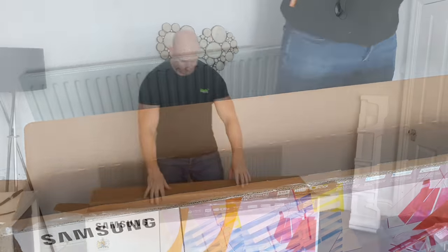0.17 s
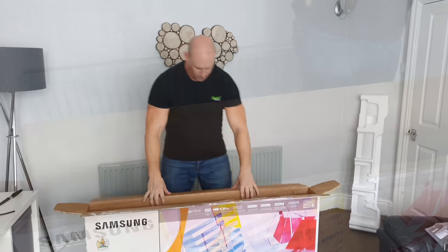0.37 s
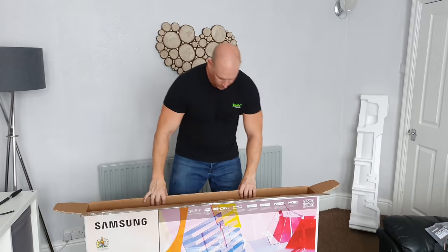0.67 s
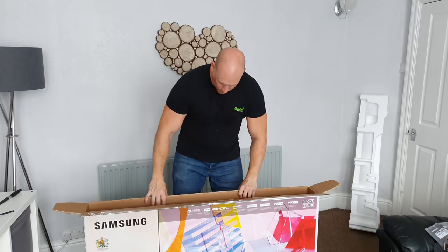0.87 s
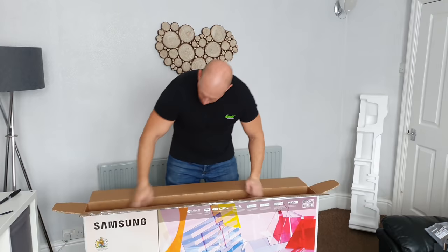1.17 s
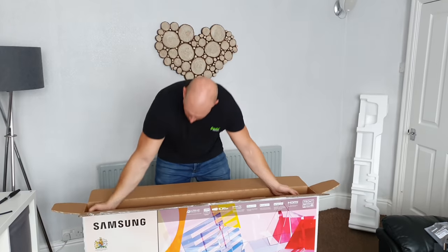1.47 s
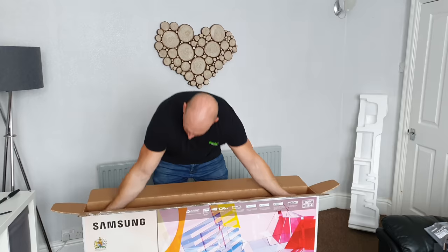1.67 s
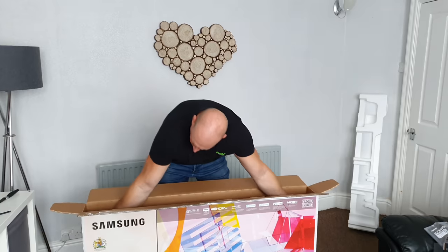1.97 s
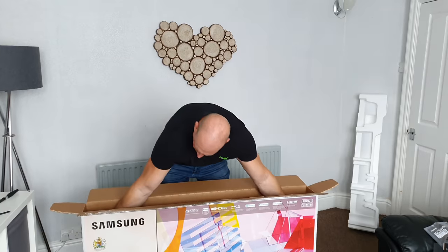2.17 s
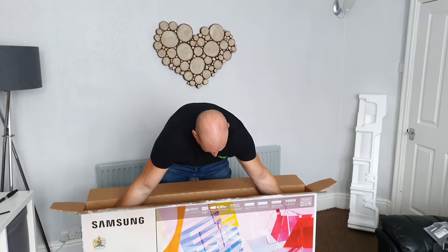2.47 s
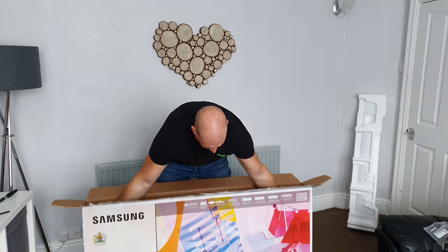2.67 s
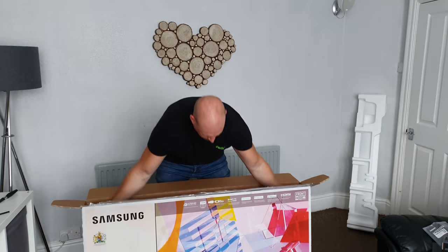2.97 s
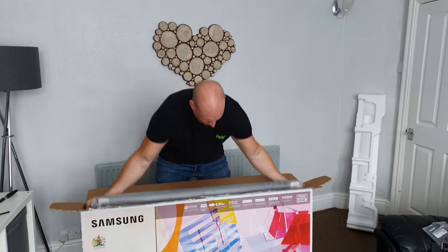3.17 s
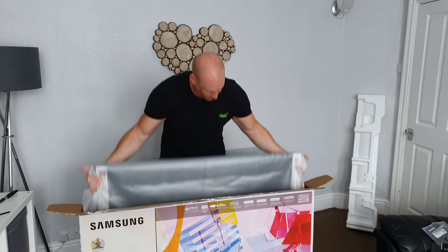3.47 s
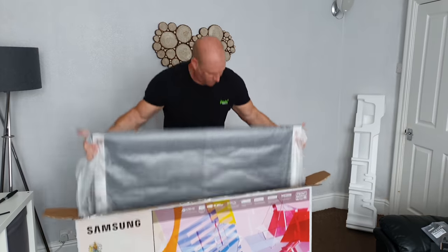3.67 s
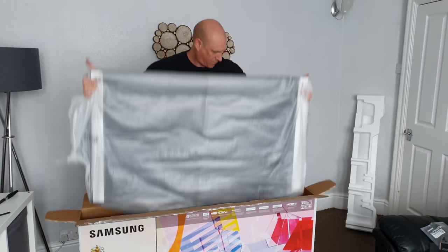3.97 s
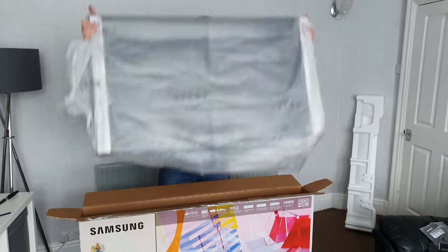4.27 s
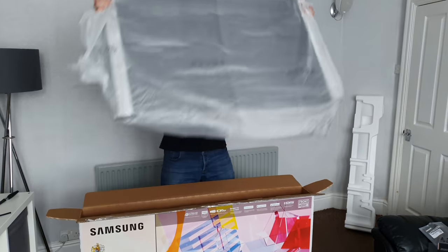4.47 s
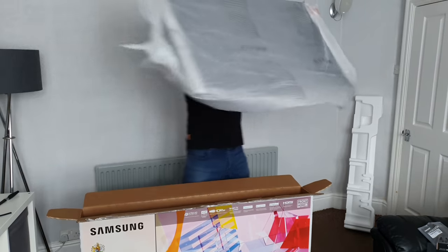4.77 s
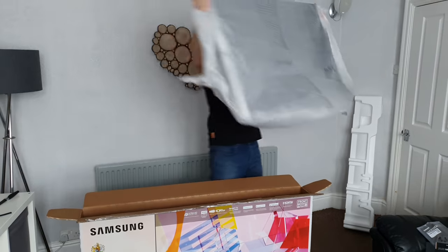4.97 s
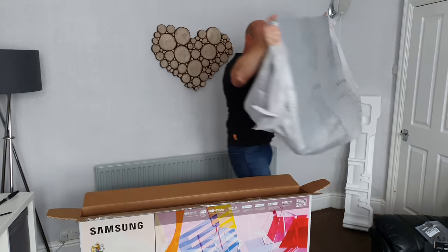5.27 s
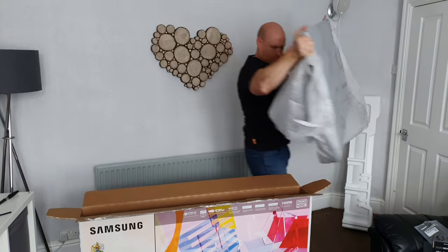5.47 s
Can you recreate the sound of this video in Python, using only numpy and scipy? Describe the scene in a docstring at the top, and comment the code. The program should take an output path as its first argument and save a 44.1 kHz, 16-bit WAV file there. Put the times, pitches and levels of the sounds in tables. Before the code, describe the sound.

In a living room, hands brush and scrape a large cardboard box, with hollow flap slaps near the start. A thin foam sleeve then slides off in one long squeaky hiss, ending in a loud, deep, boomy thud with a crack. Quiet rustling follows and grows as the sleeve is gathered, over a faint hum. Stereo microphone a few metres away.

```python
"""Hands brush and tap a large cardboard box with polystyrene packing, unpacked in a living room.
Flaps slap, a thin foam sleeve hisses off in one long pull, the load drops back with a deep thud, and
the sleeve rustles as it is carried off. Blows ring modes of box and flap; rubbing is a train of tiny
random slips, coloured and shaped by strokes; far away, a hum of wavering partials swells and sags."""
import sys
import numpy as np
from scipy import signal
from scipy.fft import rfft, irfft, next_fast_len
from scipy.io import wavfile

SR = 44100
rng = np.random.default_rng(int(sys.argv[2]) if len(sys.argv) > 2 else 0)


def wrap_up_sound(samples):
    """Save the sound to the file named by the first command line argument, as 16-bit audio."""
    columns = np.atleast_2d(samples).T
    # keep every value between -1 and 1, then stretch to whole-number steps
    tamed = np.clip(columns, -1, 1)
    steps = np.round(tamed * 32767).astype(np.int16)
    wavfile.write(sys.argv[1], SR, steps)


N = 247401
TIME = np.arange(N) / SR   # s

# Levels are relative: filters, boosts and the sum of layers set the final ones.
# blows on the box: start_s, level_db, panel_hz, dull_above_hz, loose_rattle_db, contact_build_s
KNOCKS = [(0.001, -42.5, 86, 736, 8.5, 0.0018), (0.305, -35, 130, 239, 10.5, 0.0082),
          (.555, -45, 120, 350, 2.5, 0.0036), (0.606, -39.5, 96, 604, 10.5, .002),
          (0.8445, -19.5, 160, 627, 7.5, 0.00097), (0.860, -24, 196, 650, -0.5, 0.00085),
          (0.888, -28.5, 135, 534, 11, 0.0012), (.992, -48, 250, 700, 10, .001),
          (1.262, -40, 272, 400, -2, 0.0024), (1.392, -20.5, 120, 448, 4.5, 0.0016),
          (1.406, -30.5, 118, 300, 10.5, 0.0017), (1.433, -23.5, 126, 340, 5.5, 0.00082),
          (1.512, -40, 170, 600, 9, .001), (1.612, -44, 85, 500, 6.5, .0015),
          (1.670, -39, 74.4, 418, 4, 0.0022), (2.61, -36.5, 75, 200, 7, 0.0062),
          (3.548, -34.5, 88, 454, -3, 0.0047), (3.588, -20, 80, 242, -8.5, 0.0045),
          (3.622, -27.5, 280, 350, 7, 0.0026), (3.6355, -12.5, 98, 193.6, -23, 0.0027),
          (3.6915, -3, 132, 150, -8, 0.0017), (3.7035, -1.5, 199, 425, -0.5, 0.0023),
          (3.7495, -10.5, 125, 347, 11, 0.0042), (3.7945, -13.5, 114, 192, 14, 0.0025),
          (3.842, -18, 190, 450, -3, 0.0012), (4.815, -43, 42, 58.3, 7, 0.0014)]
# modes of the box and the air in it: pitch_hz, level_db, t60_s
BOX_MODES = [(36.5, -13.5, 0.53), (72.4, -17, 0.77), (89, -6.5, 0.23), (114.3, -5, 0.43),
             (182.8, -8.5, 0.34), (222, -17.5, 0.43), (279.3, -13.5, 0.38), (362.5, -7.5, 0.26),
             (424, -18.5, 0.38), (546, -10, 0.28), (650, -18, 0.24), (786, -28, 0.22), (875, -22.5, 0.31),
             (987, -16, 0.34)]
# spectrum of the clatter of loose panels: frequency_hz, level_db per Hz
RATTLE_COLOUR = [(25, -14), (50, -20), (90, 4), (200, 10.5), (350, 10.5), (600, 9), (1100, 6), (1800, -5),
                 (4000, -40), (9000, -40), (16000, -36)]
THIN_SHARE = 0.52   # a panel radiates little below this share of its pitch
# loose panels touch a few times after a blow; the room's answer has its own level
CHATTER_PER_S, CHATTER_DECAY_S, RATTLE_TAIL_DB = 160, .035, -1

# the stiff top flap smacked against the box: start_s, level_db, favoured_pitch_hz
SLAPS = [(0.8445, -23, 673), (0.860, -22.5, 586), (0.894, -23.5, 550), (0.933, -32, 605), (.993, -37, 580),
         (1.039, -41.5, 624), (1.394, -35, 700), (1.408, -29.5, 414), (1.436, -28, 350),
         (1.466, -34.5, 550), (1.513, -40, 580), (1.615, -40.5, 397), (1.672, -38.5, 440),
         (3.716, -11, 318)]
# modes of the flap: pitch_hz, level_db, t60_s
FLAP_MODES = [(254, -15.5, 0.2), (360.4, -5.5, 0.079), (417, -8, 0.34), (474, -8.5, 0.22),
              (541.3, -10, 0.18), (578.7, -7, 0.27), (610, -3, 0.14), (683, -7.5, 0.11), (826, -11, 0.11),
              (1030, -22, .2), (1380, -17.5, .15)]

# card and foam crack as the load lands: start_s, level_db
CRACKS = [(3.7035, -22), (3.73, -34), (3.765, -35), (3.815, -43)]
# spectrum of the cracks: frequency_hz, level_db per Hz
CRACK_COLOUR = [(400, -11), (750, 7), (1000, -3), (1150, -2.5), (1400, -1.5), (1850, -5), (2300, -23.5),
                (4000, -25), (9000, -34)]
CRACK_DECAY_S = .012

# hiss of the sleeve sliding off in one pull: time_s, level_db
PULL = [(2.45, -61.5), (2.494, -60.5), (2.582, -57.5), (2.628, -53.5), (2.896, -44.5), (3.364, -43),
        (3.384, -41), (3.56, -44), (3.582, -46), (3.652, -44.5), (3.84, -56), (4.0, -65.5), (4.2, -98)]
# spectrum of the sliding sleeve: frequency_hz, level_db per Hz
SLEEVE_COLOUR = [(450, -31), (800, -5.5), (1150, -3), (1450, 1), (1850, 0.5), (2300, -1.5), (3000, -5.5),
                 (4400, -10.5), (4800, -16), (6500, -17.5), (9000, -22.5), (12400, -21), (14200, -24.5),
                 (15700, -35.5)]
# resonances of the stretched sleeve: pitch_hz (when the pull is strongest), width_hz, level_db
SLEEVE_PEAKS = [(1452, 50, -12), (1810, 46, -13.5), (2070, 110, -15)]
SING_RISE_OCTAVES_PER_S, SING_WANDER_OCTAVES = .1, .018
PULL_TREBLE_DB, TREBLE_GROWTH = -2, 1.39   # treble over middle at the peak; dB of treble per dB of pull
# the sleeve catches on the packing: middle_s, half_length_s, pitch_hz, level_db
CHIRPS = [(3.01, .06, 1400, -46.5), (3.105, .06, 1900, -42.5), (3.2, .06, 1820, -42.5),
          (3.26, .06, 1470, -43), (3.335, .06, 1810, -43), (3.42, .06, 1690, -45), (3.48, .06, 2020, -42.5)]
CHIRP_WAVER_OCTAVES, CHIRP_WAVERS_PER_S = .024, 90

# Every stroke speeds up, holds, then dies away at a steady rate.
# the empty sleeve swinging and folding: start_s, rise_s, hold_s, level_db, treble_over_middle_db
SWINGS = [(3.9, 0.047, 0.14, -61.5, 1), (4.15, 0.031, .02, -62.5, 4), (4.27, 0.018, 0.066, -67.5, -2),
          (4.56, 0.25, 0.1, -64, -2), (4.74, 0.15, 0.17, -60, -5), (5.1, 0.038, 0.13, -60.5, -8.5),
          (5.315, 0.067, 0.047, -47, -0.5), (5.47, 0.029, 0.069, -54.5, -11)]
# spectra of the swinging sheet and of its creases: frequency_hz, level_db per Hz
SWING_COLOUR = [(450, 5), (800, 4), (1050, 8.5), (1400, -1.5), (1900, 7.5), (2600, -6.5), (4200, -4),
                (5000, -12.5), (7000, -15.5), (9000, -19.5), (12500, -13.5), (15700, -25)]
CRINKLE_COLOUR = [(900, -10), (2000, -3), (3800, -9), (5000, -11), (9000, -27)]
SWING_FADE_DB_PER_S = 105
CRINKLES_PER_S, CRINKLE_DB, CRINKLE_CLUMP_DB = 130, -3, 2
# the sleeve gathered up in the hands: start_s, rise_s, hold_s, level_db
GATHERS = [(5.33, 0.085, 0.041, -42.5), (5.44, 0.045, 0.046, -44.5)]
# spectrum of the gathered folds: frequency_hz, level_db per Hz
GATHER_COLOUR = [(70, -7), (130, -4), (210, 2.5), (290, -1.5), (400, 2), (500, 10), (570, 5), (700, 0),
                 (850, -14), (1100, -17), (2000, -39)]
GATHER_FADE_DB_PER_S = 140

# packing dragging on the box wall: start_s, rise_s, hold_s, level_db
DRAGS = [(.11, 0.019, 0.037, -49.5), (.238, 0.0019, 0.024, -44), (.44, .06, .03, -54),
         (.52, 0.044, 0.02, -45), (.6, 0.0097, .025, -48), (.64, 0.077, 0.043, -53.5),
         (1.07, 0.038, 0.032, -50.5), (1.25, 0.012, 0.013, -50), (1.53, 0.012, 0.03, -49),
         (1.668, 0.0036, 0.066, -50.5), (1.83, 0.14, 0.13, -49), (2.03, 0.051, 0.045, -46),
         (2.36, 0.19, 0.1, -45), (2.62, 0.071, 1, -44), (3.45, 0.13, 0.18, -35.5),
         (4.45, 0.64, 0.69, -67.5)]
# spectrum of the dragging: frequency_hz, level_db per Hz
DRAG_COLOUR = [(25, -13), (70, 7), (110, 1.5), (170, -2), (270, 5), (370, 8), (480, 4.5), (600, 6),
               (790, 2.5), (1100, -10.5), (1700, -32.5), (3000, -74)]
DRAG_FADE_DB_PER_S = 94.5
# hands brushing card and foam: start_s, rise_s, hold_s, level_db, treble_over_middle_db
BRUSHES = [(0, 0.00022, 0.0028, -49, 2), (.1, 0.022, 0.014, -50.5, 1.5), (.217, 0.0055, 0.015, -51, 0),
           (.24, 0.0062, 0.018, -47.5, -2.5), (.4, 0.21, 0.053, -56, -5.5), (.67, 0.059, .03, -61, -7),
           (.84, 0.094, .01, -53.5, -1.5), (.95, 0.041, 0.025, -51, -3), (1.08, 0.051, 0.026, -52, -0.5),
           (1.2, 0.06, 0.029, -53, 3.5), (1.38, 0.031, 0.042, -50.5, -9.5), (1.47, 0.14, 0.39, -57.5, -1.5),
           (1.62, 0.39, 0.2, -53.5, -0.5), (2.43, 0.022, 0.11, -54, -23)]
# spectrum of the brushing: frequency_hz, level_db per Hz
BRUSH_COLOUR = [(400, -38), (800, -2), (1100, 3.5), (1500, 6), (2000, 7), (2600, 0.5), (4300, -8.5),
                (4900, -16), (7000, -22.5), (8800, -30), (12400, -26.5), (15700, -29)]
BRUSH_FADE_DB_PER_S = 99.5
# snaps, scuffs and taps of foam and card: start_s, peak_db, pitch_hz, width_hz, build_s
SNAPS = [(0.003, -38, 1740, 504, 0.0053), (0.124, -40.5, 6000, 9000, 0.003),
         (0.224, -43, 12500, 7000, .0015), (0.242, -30.5, 13100, 7000, 0.00046),
         (0.2414, -33, 1190, 2390, 0.0032), (0.61, -41.5, 800, 1110, 0.0025),
         (0.844, -34, 1460, 1630, 0.013), (1.445, -44, 1880, 1370, 0.003), (1.452, -45, 1870, 1290, 0.003),
         (1.471, -41, 1680, 796, 0.011), (1.672, -43, 610, 600, 0.0015), (2.445, -43, 2250, 2900, 0.0013),
         (2.55, -32, 800, 500, 0.074), (3.968, -46, 7550, 8500, .001), (4.16, -37.5, 342, 122, 0.015),
         (4.18, -52.5, 1504, 1500, 0.0091), (4.283, -56, 2100, 1200, .008),
         (4.365, -59, 2100, 1200, 0.0093), (4.482, -60.5, 1995, 900, 0.0063),
         (4.589, -53.5, 3860, 896, 0.011), (4.652, -56.5, 3720, 1410, 0.014),
         (4.716, -52, 3600, 2000, 0.021), (4.827, -50.5, 3300, 2200, .012),
         (4.972, -45.5, 2260, 800, 0.007), (5.385, -29, 563, 238, 0.016), (5.447, -53, 600, 400, 0.0028),
         (5.495, -41, 630, 695, 0.001)]

# partials of the distant hum: multiple of the fundamental, level_db
HUM_PARTIALS = [(1, 3.5), (2, -21.5), (3, -5)]
HUM_DB, HUM_HZ = -70, 72.7   # the pitch before it sags
SWELL_START_S, SWELL_DB_PER_S, SAG_HZ_PER_S = 4.78, 25.5, 1.54
HUM_WAVER_RAD = 0.36      # phase waver per multiple above the fundamental
OVERTONE_SWELL = 0.93     # share of the swell in dB that the overtones follow
# spectrum of the room air: frequency_hz, level_db per Hz
AIR_COLOUR = [(15, -21), (30, -3.5), (60, -9), (110, -25), (170, -9), (350, -22.5), (700, -26), (1000, -25),
              (2000, -29.5), (3000, -34.5), (4200, -36.5), (6000, -33.5), (9000, -40.5), (15700, -37.5)]
AIR_DB = -60.5

# likeness of the two ears: frequency_hz, correlation (no unit)
LIKENESS = [(30, 0.85), (125, 0.84), (250, 0.89), (500, 0.65), (1000, -0.024), (2000, -0.072),
            (4000, -0.023), (16000, -0.056)]
# reverberation of the room: frequency_hz, t60_s
ROOM_T60 = [(60, 0.17), (250, 0.72), (1000, 0.63), (4000, 0.49), (16000, 0.24)]
CUTOFF_HZ = 15750


def knocks():
    """Impact excitation: a panel flexes, box modes ring, parts rattle; higher-pitched panels sound thinner."""
    out, t = np.zeros((2, N)), TIME[:SR]
    hz, modes = ringing(BOX_MODES)
    rattles = []
    for _ in range(5):   # the blows use these in turn
        tail = from_db(RATTLE_TAIL_DB) * dying_field(RATTLE_COLOUR)
        rattles.append(tail + from_db(6) * chatter())
    for k, (s, db, panel_hz, dull_hz, loose_db, build_s) in enumerate(KNOCKS):
        flex = from_db(1.5) * np.sin(2 * np.pi * panel_hz * t) * np.exp(-t / 0.0095)
        ring = from_db(-4) * (strengths(hz, spread_db=2, ears_db=3) @ modes)
        clatter = from_db(loose_db - 19) * rattles[k % len(rattles)]
        blow = (flex + ring + clatter) * (1 - np.exp(-t / build_s))
        dulled = cut(blow, dull_hz, "low")   # each blow has its own dullness
        add(out, s, from_db(db) * cut(dulled, THIN_SHARE * panel_hz, "high"))
    return out


def chatter():
    """Repeated contact: a dying run of separate touches of loose panels."""
    touches = (rng.random((2, SR)) < CHATTER_PER_S / SR) * rng.choice([-1, 1], (2, SR))
    return diffuse(touches, RATTLE_COLOUR) * np.exp(-TIME[:SR] / CHATTER_DECAY_S)


def slaps():
    """Selective modal excitation: where the bouncing flap lands decides which modes clap hollowly."""
    out = np.zeros((2, N))
    hz, modes = ringing(FLAP_MODES)
    build = 1 - np.exp(-TIME[:SR] / 0.002)
    for s, db, favoured_hz in SLAPS:
        octaves_off = np.abs(np.log2(hz / favoured_hz))
        stirred = strengths(hz, spread_db=2, ears_db=2) * from_db(-14 * octaves_off)
        add(out, s, from_db(db) * (stirred @ modes) * build)
    return out


def cracks(tail_db=-15, tail_t60_s=.45):
    """Impulsive crushing: foam against card gives a sudden noise burst and the room's slower answer."""
    out, t = np.zeros((2, N)), TIME[:SR // 2]
    tail = from_db(tail_db - 60 * t / tail_t60_s)
    fall = np.exp(-t / CRACK_DECAY_S) + tail
    for s, db in CRACKS:
        add(out, s, from_db(db) * fall * diffuse(rng.standard_normal((2, len(t))), CRACK_COLOUR))
    return out


def sleeve(level_db=8, waver_db=3):
    """Sliding friction: dense slips hiss and excite resonances of the taut foam that waver and climb."""
    grains = rubbed(slips(per_s=6000, spread_db=1.5, clump_db=0.67, clumps_per_s=120), SLEEVE_COLOUR)
    pull = pull_gain()
    climb = SING_RISE_OCTAVES_PER_S * (TIME - TIME[pull.argmax()])
    for hz, width_hz, db in SLEEVE_PEAKS:
        pitch = hz * 2 ** (climb + SING_WANDER_OCTAVES * drift(14))
        song = sing(pitch, width_hz) * from_db(waver_db * drift(25))
        grains = grains + from_db(db) * rms_one(song)
    treble = from_db(PULL_TREBLE_DB) * pull.max() * (pull / pull.max()) ** TREBLE_GROWTH
    return from_db(level_db) * stroke(grains, (pull, treble), split_hz=5130)


def pull_gain():
    """Interpolation in decibels: the pull's gain over time, with 30 ms fades beyond its ends."""
    s, db = np.transpose(PULL)
    inside = np.clip(1 + np.minimum(TIME - s[0], s[-1] - TIME) / .03, 0, 1)
    return inside * from_db(np.interp(TIME, s, db))


def sing(hz, width_hz):
    """Narrow-band resonance: slow noise modulates a carrier whose pitch may move; rms 1."""
    wobble = cut(rng.standard_normal((2, 2, len(hz))), width_hz / 2, "low")
    phase = 2 * np.pi * np.cumsum(hz) / SR
    return rms_one(wobble[0] * np.cos(phase) + wobble[1] * np.sin(phase))


def chirps():
    """Stick and release: each catch of the sleeve swells into a rough squeak, out of step at the ears."""
    out = np.zeros((2, N))
    for s, half_length_s, hz, db in CHIRPS:
        swell = np.hanning(int(2 * half_length_s * SR))
        pitch = hz * 2 ** (CHIRP_WAVER_OCTAVES * drift(CHIRP_WAVERS_PER_S)[:len(swell)])
        cycles = np.cumsum(pitch) / SR + rng.random((2, 1)) / 2
        tone = np.sin(2 * np.pi * cycles)
        add(out, s - half_length_s, from_db(db) * swell * rms_one(tone))
    return out


def swing():
    """Sparse friction and buckling: the slack sheet rustles; its creases flip, heard mostly off the walls."""
    rustle = rubbed(slips(per_s=2700, spread_db=0.5, clump_db=0, clumps_per_s=30), SWING_COLOUR)
    flips = slips(per_s=CRINKLES_PER_S, spread_db=3, clump_db=CRINKLE_CLUMP_DB, clumps_per_s=18)
    crinkles = rubbed(flips, CRINKLE_COLOUR, early_s=0.051, direct_share=0.17)
    gains = bright_strokes(SWINGS, SWING_FADE_DB_PER_S)
    return stroke(rustle + from_db(CRINKLE_DB) * crinkles, gains, split_hz=7300)


def gather():
    """Buckling friction: folds of the empty sleeve rub together."""
    grains = rubbed(slips(per_s=3100, spread_db=-1, clump_db=-1, clumps_per_s=330), GATHER_COLOUR)
    return strokes(GATHERS, GATHER_FADE_DB_PER_S) * grains


def drag(firm_db=-46, bass_hz=280):
    """Friction-driven wall: packing scrapes hollowly; firmer dragging moves the whole wall and adds bass."""
    grains = rubbed(slips(per_s=1500, spread_db=0, clump_db=-0.5, clumps_per_s=55), DRAG_COLOUR)
    force = strokes(DRAGS, DRAG_FADE_DB_PER_S)
    bass = signal.sosfiltfilt(signal.butter(2, bass_hz, fs=SR, output="sos"), grains)
    wall_bass = bass * force / from_db(firm_db)
    return force * (grains - bass + wall_bass)


def hands():
    """Dry friction: skin brushes over card and foam in many small slips."""
    grains = rubbed(slips(per_s=6500, spread_db=0, clump_db=-3.5, clumps_per_s=94), BRUSH_COLOUR)
    return stroke(grains, bright_strokes(BRUSHES, BRUSH_FADE_DB_PER_S), split_hz=6700)


def snaps(tail_db=-13):
    """Resonant burst: brief noise passes one resonance twice, with a tail at the room's decay."""
    out, t = np.zeros((2, N)), TIME[:SR // 2]
    for s, db, hz, width_hz, build_s in SNAPS:
        rise = 1 - np.exp(-t / build_s)
        tail = from_db(tail_db - 60 * t / at_hz(ROOM_T60, hz))
        fall = np.exp(-t / (2 * build_s)) + tail
        burst = diffuse(rng.standard_normal((2, len(t))), [(hz, 0)]) * rise * fall
        snap = resonate(resonate(burst, hz, width_hz), hz, width_hz)
        add(out, s, from_db(db) * snap / np.abs(snap).max())
    return out


def background():
    """Harmonic series over noise: a distant hum, steady then swelling and sagging, in coloured room air."""
    swelling_s = np.maximum(TIME - SWELL_START_S, 0)
    phase = 2 * np.pi * np.cumsum(HUM_HZ - SAG_HZ_PER_S * swelling_s) / SR
    swell_db = SWELL_DB_PER_S * swelling_s
    waver = HUM_WAVER_RAD * drift(20)
    hum = 0
    for multiple, db in HUM_PARTIALS:
        followed = OVERTONE_SWELL if multiple > 1 else 1
        partial = np.sin(multiple * phase + (multiple - 1) * waver)
        hum = hum + partial * from_db(HUM_DB + db + swell_db * followed)
    air = from_db(AIR_DB) * diffuse(rng.standard_normal((2, N)), AIR_COLOUR)
    return np.sqrt(2) * hum + air   # root 2: levels of the partials are rms


def slips(per_s, spread_db, clump_db, clumps_per_s):
    """Stick-slip friction: tiny random slips of either sign, stronger and weaker as surfaces catch and let go."""
    sizes = from_db(spread_db * np.minimum(rng.exponential(1, (2, N)), 4)) * rng.choice([-1, 1], (2, N))
    return sizes * (rng.random((2, N)) < per_s / SR) * from_db(clump_db * drift(clumps_per_s))


def rubbed(grains, colour, early_s=0.035, direct_share=0.86):
    """Early reflection: friction heard directly and off box and walls, which ripple its colour."""
    t = TIME[:SR // 4]
    echoes = rng.standard_normal((2, len(t))) * np.exp(-t / early_s)
    reflected = rms_one(signal.oaconvolve(grains, echoes, axes=1)[:, :N])
    direct = np.sqrt(direct_share) * rms_one(grains)   # shares are of power
    return diffuse(direct + np.sqrt(1 - direct_share) * reflected, colour)


def stroke(grains, gains, split_hz):
    """Band-dependent friction: force sets a stroke's middle range, speed its treble."""
    mid_gain, treble_gain = gains
    low, high = cut(grains, split_hz, "low", order=3), cut(grains, split_hz, "high", order=3)
    return mid_gain * rms_one(low) + treble_gain * rms_one(high)


def envelope(start_s, rise_s, hold_s, fade_db_per_s):
    """Amplitude envelope: a smooth rise, a hold and a steady fade in decibels."""
    rise = np.sin(np.pi / 2 * np.clip((TIME - start_s) / rise_s, 0, 1)) ** 2
    fading_s = np.clip(TIME - start_s - rise_s - hold_s, 0, 2)
    return rise * from_db(-fade_db_per_s * fading_s)


def strokes(rows, fade_db_per_s):
    """Dominance of the strongest: at each moment the loudest stroke sets the gain."""
    gains = [from_db(db) * envelope(s, rise_s, hold_s, fade_db_per_s) for s, rise_s, hold_s, db in rows]
    return np.max(gains, axis=0)


def bright_strokes(rows, fade_db_per_s):
    """Spectral balance: separate middle and treble gains for strokes that differ in brightness."""
    middle = [(s, rise_s, hold_s, db) for s, rise_s, hold_s, db, _ in rows]
    treble = [(s, rise_s, hold_s, db + treble_db) for s, rise_s, hold_s, db, treble_db in rows]
    return strokes(middle, fade_db_per_s), strokes(treble, fade_db_per_s)


def ringing(table):
    """Modal decay: the pitches of a body's modes and a second of each one's dying sine."""
    t = TIME[:SR]
    hz, db, t60 = np.transpose(table)
    decay = from_db(db[:, None] - 60 * t / t60[:, None])
    return hz, np.sin(2 * np.pi * hz[:, None] * t) * decay


def strengths(hz, spread_db, ears_db):
    """Modal participation: each blow stirs modes anew, less equally at the ears where likeness is low."""
    unlike = np.sqrt(np.clip(1 - at_hz(LIKENESS, hz), 0, 1))
    shared_db = spread_db * rng.standard_normal(len(hz))
    return from_db(shared_db + ears_db * unlike * rng.standard_normal((2, len(hz))))


def dying_field(colour):
    """Reverberation: a second of dense reflections, each octave dying at the room's own rate."""
    rest, out, t = diffuse(rng.standard_normal((2, SR)), colour), 0, TIME[:SR]
    for hz in np.geomspace(125, 16000, 8):   # peel off octaves from the bass upward
        band = signal.sosfiltfilt(signal.butter(2, hz, fs=SR, output="sos"), rest)
        rest = rest - band
        out = out + band * from_db(-60 * t / at_hz(ROOM_T60, hz))
    return out


def diffuse(pair, colour):
    """Interaural coherence: two signals become a coloured stereo field, alike in the bass; rms 1."""
    n = pair.shape[1]
    size = next_fast_len(n)
    hz = np.maximum(np.arange(size // 2 + 1) * SR / size, 1)
    mid, side = rfft(pair, size) * from_db(at_hz(colour, hz))
    alike = np.clip(at_hz(LIKENESS, hz), -1, 1)
    ears = np.sqrt(1 + alike) * mid + np.sqrt(1 - alike) * side * [[1], [-1]]
    return rms_one(irfft(ears, size)[:, :n])


def resonate(x, hz, width_hz):
    """Resonance: a two-pole filter with gain near 1 at its peak."""
    r = np.exp(-np.pi * width_hz / SR)
    zeros = np.array([1, 0, -1]) * (1 - r * r) / 2
    return signal.lfilter(zeros, [1, -2 * r * np.cos(2 * np.pi * hz / SR), r * r], x)


def cut(x, hz, kind, order=2):
    """Filtering: a causal low- or high-pass."""
    return signal.sosfilt(signal.butter(order, hz, kind, fs=SR, output="sos"), x)


def drift(per_s):
    """Slow random fluctuation: straight lines between normal random knots."""
    knots = rng.standard_normal(N // 50)
    return np.interp(TIME * per_s, np.arange(len(knots)), knots)


def at_hz(points, hz):
    """Logarithmic frequency scale: read a table between its points."""
    f, value = np.transpose(points)
    return np.interp(np.log(hz), np.log(f), value)


def from_db(db):
    """Decibel scale: level to amplitude gain."""
    return 10 ** (np.asarray(db) / 20)


def rms_one(x):
    """Normalisation: scale to unit power."""
    return x / np.sqrt(np.mean(x ** 2) + 1e-20)


def add(out, s, sound):
    """Superposition: mix a sound in at its moment."""
    start = round(s * SR)
    out[:, start:start + sound.shape[-1]] += sound[..., :N - start]


def scene(left_db=0.5):
    """Superposition and level panning: all layers sum; the handling lies a little to the left."""
    impacts = slaps() + cracks() + snaps()
    friction = sleeve() + chirps() + swing() + gather() + drag() + hands()
    handling = (impacts + friction) * from_db([[left_db], [-left_db]])
    return knocks() + handling + background()


def record(dry):
    """Band limiting: a steep elliptic low-pass removes the top."""
    return signal.sosfilt(signal.ellip(10, .2, 80, CUTOFF_HZ, fs=SR, output="sos"), dry)


dry = scene()
out = record(dry)
wrap_up_sound(out)
```